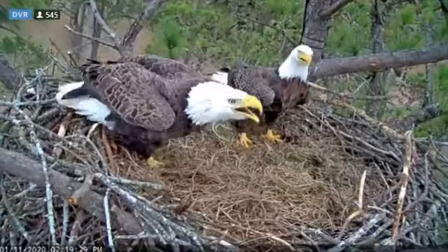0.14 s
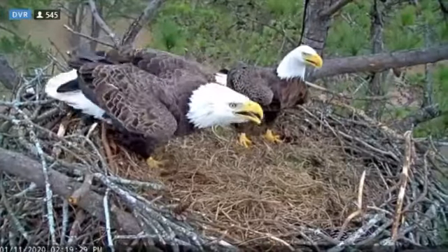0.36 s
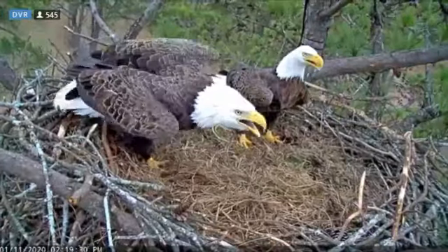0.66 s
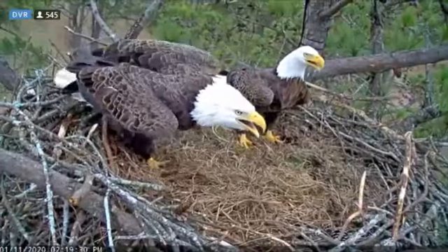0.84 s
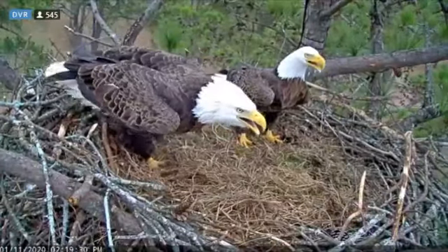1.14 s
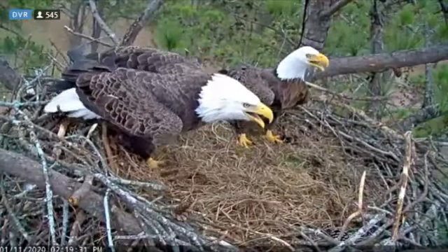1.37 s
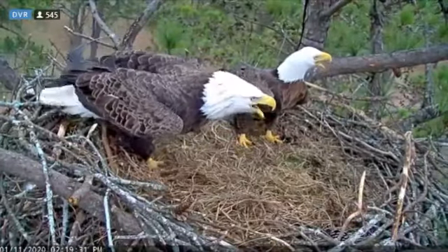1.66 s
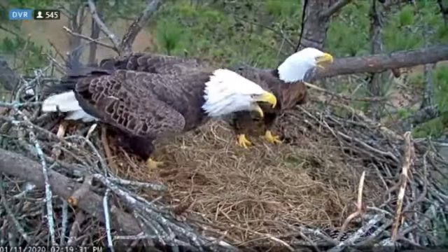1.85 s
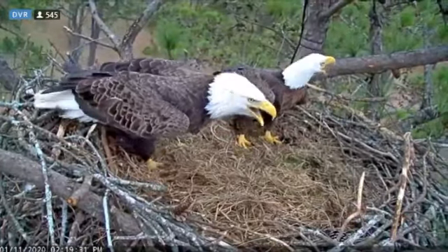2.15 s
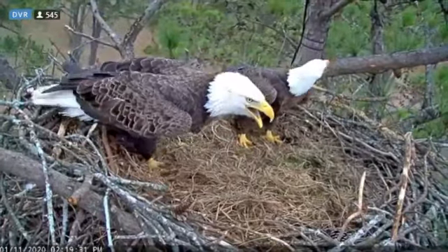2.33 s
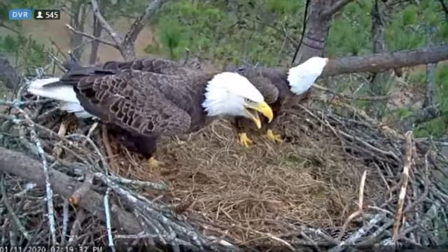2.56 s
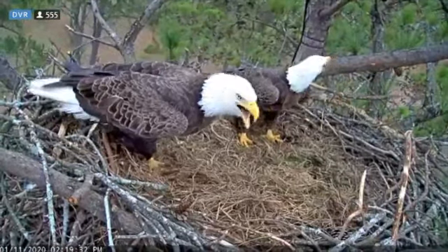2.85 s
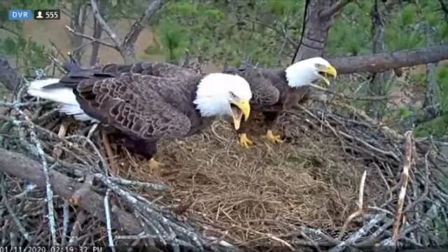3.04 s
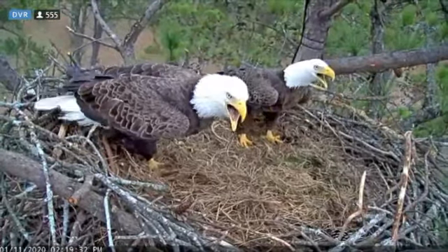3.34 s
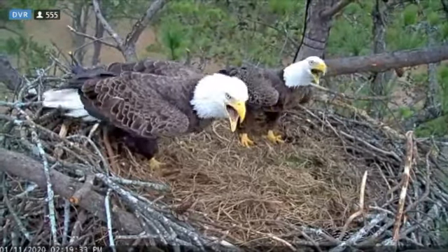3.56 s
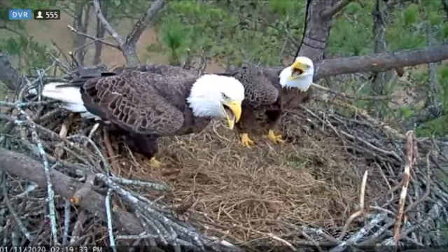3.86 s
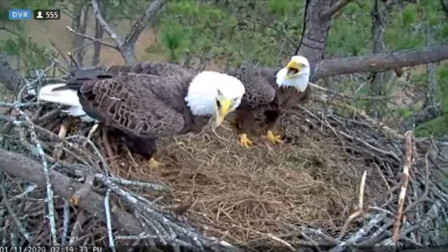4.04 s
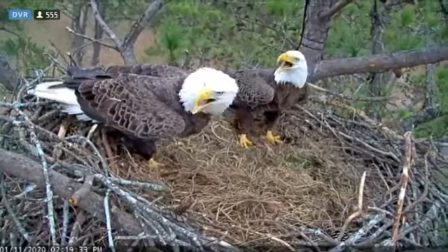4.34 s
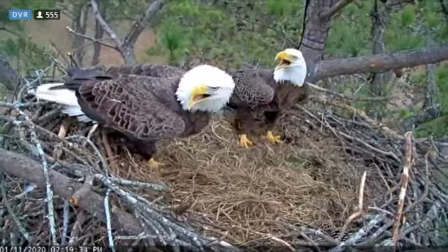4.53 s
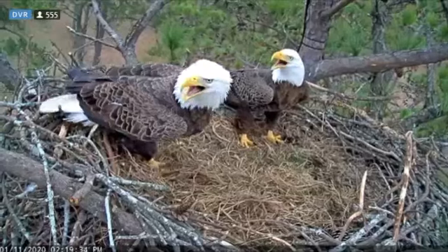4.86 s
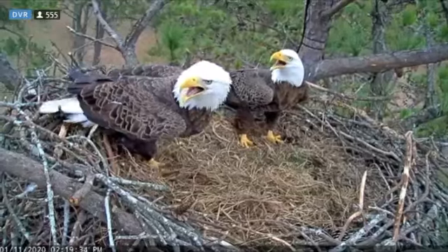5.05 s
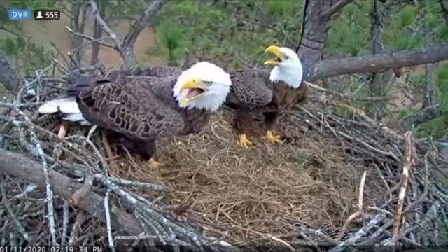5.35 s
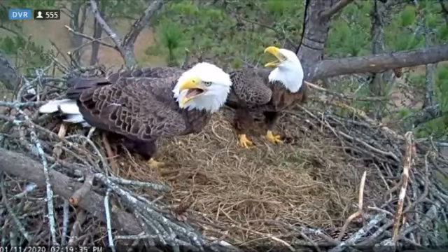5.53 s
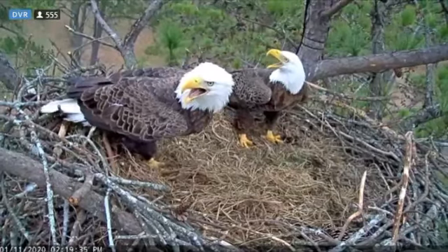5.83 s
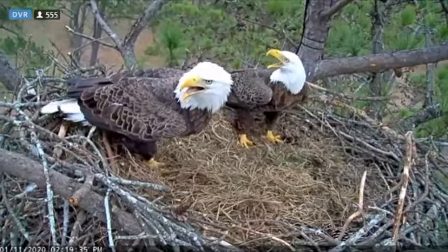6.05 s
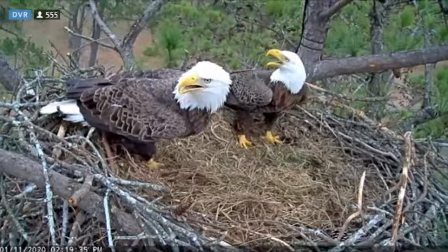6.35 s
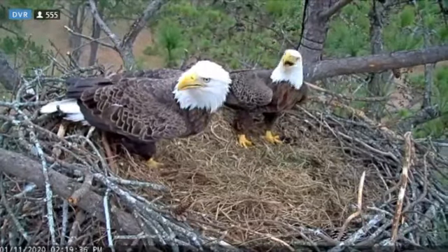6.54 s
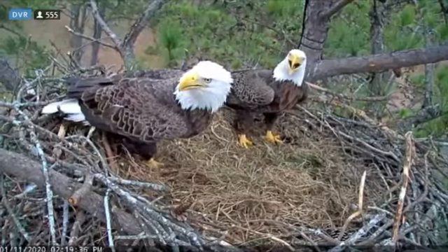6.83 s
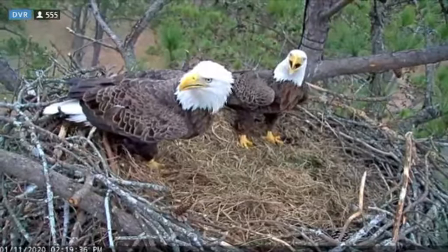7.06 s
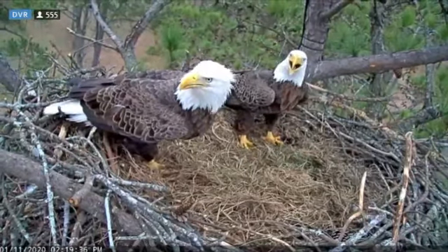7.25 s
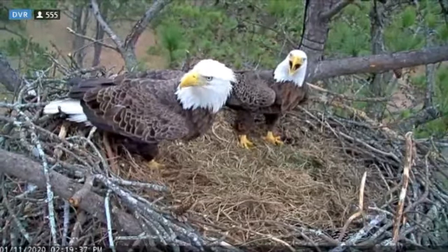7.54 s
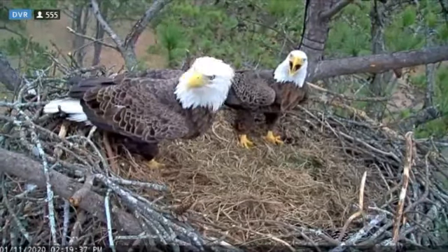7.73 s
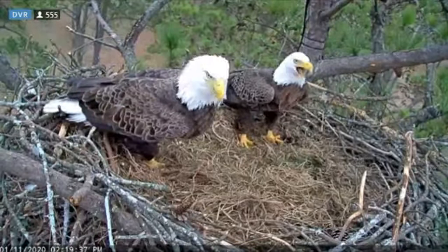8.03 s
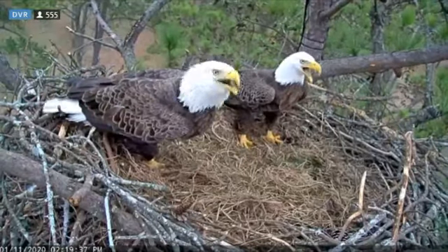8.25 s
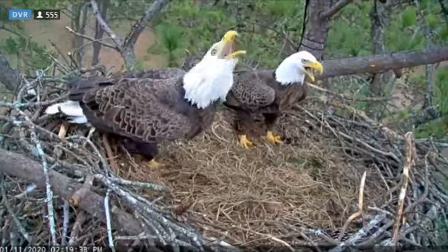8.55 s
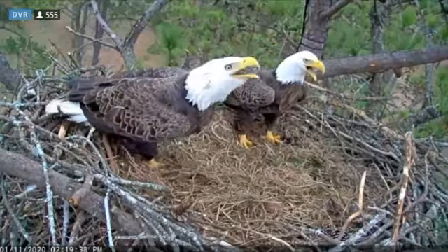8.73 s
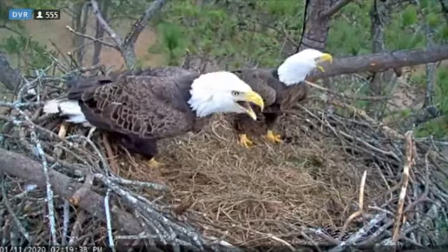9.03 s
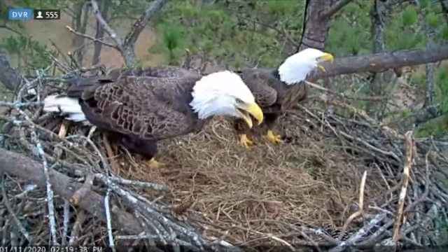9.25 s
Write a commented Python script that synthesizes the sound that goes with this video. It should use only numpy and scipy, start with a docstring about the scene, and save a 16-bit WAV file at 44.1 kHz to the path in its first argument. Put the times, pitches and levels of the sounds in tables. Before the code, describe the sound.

Two eagles call on a treetop nest in short bouts with brief pauses. They start with clear pips and creaky rasps, then break into quick runs of high, falling whistles and sharp chirps, some clean and some strained. The last calls end hoarsely. Soft low wind, faint rustling and a distant hum lie underneath. A small outdoor microphone gives the calls a thin, bright edge.

```python
"""Two eagles chatter on a treetop nest: clear pips, arched two-voiced whistles, quick chirps and a
creaky rasp. Membranes swinging in the voice box make the tones; rushing air and slipping folds make
the rasp. The sticks and trees echo faintly. Wind with soft thuds, rustling sticks and a distant hum lie
below. A small outdoor camera samples at a low rate, so every tone gets a mirror image in the treble."""
import sys
import numpy as np
from scipy import signal
from scipy.io import wavfile

SR = 44100
rng = np.random.default_rng(int(sys.argv[2]) if len(sys.argv) > 2 else 0)


def master_out(mix):
    """Clip the mix to full scale and print it as 16-bit PCM to the path in sys.argv[1]."""
    frames = np.transpose(np.atleast_2d(mix))
    ceiling = np.clip(frames, -1, 1)
    pcm = np.round(ceiling * 32767).astype(np.int16)
    wavfile.write(sys.argv[1], SR, pcm)


N = 414099

# Short, clear calls: start_s, length_ms, start_hz, end_hz, effort_db
PIPS = [(0.08, 10.9, 1581, 1980, -25.5), (0.089, 17.2, 2056, 2215, -25.5), (0.495, 30.1, 1781, 2390, -25),
        (0.52, 14.9, 2698, 2768, -23), (1.913, 19, 2872, 2872, -31.5), (1.906, 39.3, 2467, 2188, -42),
        (1.977, 25.2, 1799, 2230, -41), (2.001, 20.6, 2719, 2760, -28.5), (2.113, 19, 2261, 2187, -27),
        (2.221, 30.2, 2120, 2068, -27.5), (2.244, 17.6, 2191, 2061, -31), (2.336, 22.5, 1711, 1529, -32),
        (3.233, 33.7, 2067, 2476, -37.5), (3.251, 20, 2785, 2865, -24), (3.266, 16.4, 2716, 2765, -36),
        (3.276, 16.6, 2891, 2707, -27.5), (3.296, 17.4, 2838, 2685, -28), (3.363, 13.7, 2821, 2770, -21.5),
        (3.484, 17, 2700, 2775, -19), (3.618, 21.7, 2262, 2162, -21), (3.635, 22.95, 2161, 2285, -22.5),
        (3.769, 11.03, 1784, 2103, -22), (3.773, 31.3, 2079, 2027, -23), (3.789, 23.2, 1994, 2039, -25.5),
        (3.939, 22.1, 1713, 1542, -26), (5.043, 16, 2076, 2225, -26), (5.06, 18, 2270, 2353, -21.5),
        (5.08, 19.5, 2915, 2670, -25.5), (5.099, 19.3, 2826, 2674, -27), (5.119, 14.2, 2740, 2430, -33.5),
        (5.169, 23.9, 2661, 2849, -26), (5.193, 15.4, 2884, 2797, -25), (5.207, 19.4, 3046, 2693, -29),
        (5.227, 15.5, 2458, 1920, -41.5), (5.299, 23.3, 2272, 2312, -22), (5.362, 9.4, 2252, 1860, -31),
        (5.459, 24.6, 2245, 2137, -22), (5.474, 25.3, 2244, 2239, -20), (5.63, 14.5, 1824, 1952, -26.5),
        (5.638, 18.6, 2101, 1934, -23), (5.652, 25.8, 2018, 2000, -25), (5.88, 30.3, 1776, 1694, -25.5),
        (5.898, 26.8, 1729, 1625, -27), (6.259, 10.73, 1360, 1150, -31.5), (6.264, 15.76, 1310, 1141, -32),
        (8.49, 12.5, 1716, 1775, -32), (8.499, 11.34, 1972, 2100, -26), (8.514, 18, 2552, 2664, -26.5),
        (8.531, 18.6, 2748, 2723, -35), (8.924, 21.7, 1951, 2246, -25), (8.944, 20.4, 2722, 2680, -24.5)]
# Tone colour of the rustling and of the hiss around pips: pitch_hz, relative_db
HISS_SPECTRUM = [(1500, -32), (3000, -15), (5000, 0.5), (6800, 1), (7600, -4)]
USUAL_EFFORT_DB = -28   # pips pushed harder than this are brighter and hiss more


def from_db(db):
    """Turn decibels into a gain."""
    return 10 ** (np.asarray(db) / 20)


def unit_level(x):
    """Scale a sound to an average (rms) level of 1."""
    return x / np.sqrt(np.mean(x ** 2) + 1e-20)


def over_time(rows):
    """Join (time_s, value) rows into one value per sample."""
    return np.interp(np.arange(N) / SR, *np.transpose(rows))


def drift(per_s, size):
    """A random wobble of about 1: random points joined by lines."""
    step = SR / per_s
    points = rng.standard_normal(int(np.ceil(size / step + 2)))
    return 1.347 * np.interp(np.arange(size) / step, np.arange(len(points)), points)


def filtered(x, order, hz, kind, rate=SR):
    """Keep the "low" side, the "high" side or a "band" of a sound."""
    return signal.sosfilt(signal.butter(order, hz, kind, fs=rate, output="sos"), x)


def shaped_noise(spectrum, flicker_db):
    """Noise in half-octave bands, each with its own level and slow flicker."""
    out, edges = 0, 22 * 2 ** np.arange(0, 8.6, .5)
    white = rng.standard_normal((2, N))
    hz, db = np.transpose(spectrum)
    for k, (low, high) in enumerate(zip(edges, edges[1:])):
        level_db = np.interp(np.log(low * high) / 2, np.log(hz), db, right=-90)
        band = filtered(white[k % 2], 3, [low, high], "band")
        out = out + from_db(level_db + flicker_db * drift(8, N)) * band
    return unit_level(out)


def add(out, start_s, sound):
    """Mix a sound in at a given time."""
    at = round(start_s * SR)
    out[at:at + len(sound)] += sound


def progress(ms):
    """A ramp from 0 to 1 across a note, called u below."""
    return np.linspace(0, 1, round(ms * SR / 1000))


def swell(u, fullness, skew):
    """Fade in and out; low fullness is squarer, low skew peaks earlier."""
    return np.sin(np.pi * u ** skew).clip(0) ** fullness


def phase_of(hz):
    """The running angle of a wave that follows a pitch curve."""
    return 2 * np.pi * (np.cumsum(hz) / SR + rng.random())


def ring(x, hz, width_hz):
    """Pass a sound twice through one resonance; narrower rings longer."""
    r = np.exp(-np.pi * width_hz / SR)
    feed = np.array([1, 0, -1]) * (1 - r * r) / 2
    feedback = [1, -2 * r * np.cos(2 * np.pi * hz / SR), r * r]
    return signal.lfilter(feed, feedback, signal.lfilter(feed, feedback, x))


def distant_hum():
    """A faint, low wash of noise from far away."""
    # Tone colour of the hum: pitch_hz, relative_db
    spectrum = [(40, -44), (90, -30.5), (180, -2.5), (355, -7), (630, -14.5), (1170, -11), (1590, -26),
                (3200, -40), (6800, -33.5), (7800, -49)]
    return from_db(-60.5) * shaped_noise(spectrum, flicker_db=1.7161)


def far_wind():
    """Wind rushes through distant treetops."""
    # Strength of the rush: time_s, level_db
    levels = [(0, -63), (3, -64.5), (5, -70.5), (7.5, -71.5), (8.4, -65), (8.8, -55), (9.39, -69.5)]
    rush = filtered(rng.standard_normal(N), 2, [620, 1178], "band")
    return from_db(over_time(levels)) * unit_level(rush)


def wind_and_rustle():
    """Gusts rumble and stir the leaves; nest sticks shift and crackle."""
    # Strength of the wind: time_s, level_db
    levels = [(0, -42.5), (0.47, -47), (0.55, -55), (0.9, -52), (1.05, -61), (1.55, -54), (1.75, -61),
              (3.6, -60.5), (6.3, -66), (7.05, -63.5), (7.2, -59), (7.6, -59.5), (8.05, -51), (8.29, -63.5),
              (8.61, -54), (8.76, -61), (9.0, -54), (9.39, -58.5)]
    # Tone colour of the gusts: pitch_hz, relative_db
    spectrum = [(30, -29), (80, -13.5), (150, 0), (300, -5), (520, -32)]
    # Shifting sticks: start_s, length_ms, level_db
    stick_shifts = [(0.86, 157, -88)]
    gusts = from_db(over_time(levels) + 3 * drift(18, N))
    rustle = from_db(-29.5) * gusts   # the leaves follow the wind
    for start_s, ms, db in stick_shifts:
        u = progress(ms)
        crackle = from_db(db + 12.4 * drift(65.2, len(u)))
        add(rustle, start_s, crackle * swell(u, fullness=.98, skew=1))
    rumble = gusts * shaped_noise(spectrum, flicker_db=1)
    return rumble + rustle * shaped_noise(HISS_SPECTRUM, flicker_db=0)


def wind_bumps():
    """Gusts of wind make three short, low thuds."""
    # Thuds of wind: start_s, level_db
    bumps = [(7.272, -51), (7.327, -49.5), (7.405, -54)]
    pitch_hz, width_hz = 110.5, 77.4
    pushes = np.full(N, 1e-18)
    for start_s, db in bumps:
        pushes[round(start_s * SR)] = from_db(db) * SR / width_hz
    return ring(pushes, pitch_hz, width_hz)


def echo(x, level_db, fade_s):
    """Many small reflections blur into a tail that falls 60 dB in fade_s."""
    t = np.arange(round(.3 * SR)) / SR
    tail = rng.standard_normal(len(t)) * from_db(-60 * t / fade_s)
    tail /= np.sqrt(np.sum(tail ** 2))
    return from_db(level_db) * signal.fftconvolve(x, tail)[:N]


def throat(x, skip_lowest=0, flicker_db=0):
    """The throat rings at several pitches, each able to flicker on its own."""
    # Throat resonances: pitch_hz, width_hz, gain_db
    resonances = [(907, 330, -10.5), (1500, 640, -2.5), (2445, 1200, -14), (3500, 350, -10.5),
                  (4143, 500, -8.5), (5196, 660, -6), (6500, 2000, -9)]
    return sum((-1) ** k * from_db(db + flicker_db * drift(130, N)) * ring(x, hz, width_hz)
               for k, (hz, width_hz, db) in enumerate(resonances[skip_lowest:]))


def creaks():
    """Single soft slips of the folds ring the throat and chest for a few cycles."""
    # Lone slips: start_s, strength_db
    slips = [(0.5422, -43.5), (0.5499, -44.5), (0.6142, -40), (0.625, -38.5), (3.41, -42), (3.416, -48),
             (8.5536, -39.5), (8.601, -49.5), (8.638, -42.5), (8.658, -40.5), (8.683, -36), (8.69, -45.5),
             (8.978, -38), (9.005, -53.5), (9.023, -39), (9.032, -47), (9.041, -45), (9.05, -36.5),
             (9.0608, -36), (9.077, -41)]
    clicks = np.full(N, 1e-18)
    for start_s, db in slips:
        clicks[round(start_s * SR)] = from_db(db + 36.5)   # ringing spreads a click and lowers its peak
    creak = ring(clicks, hz=1498, width_hz=520)
    chest = ring(clicks, hz=340, width_hz=160)
    return creak + from_db(-1) * chest + from_db(-12) * throat(clicks, skip_lowest=2)


def rasps():
    """A fluttering hiss lies above uneven slips of the folds that croak in the throat."""
    # Hoarse endings of calls: start_s, length_ms, level_db
    endings = [(0.1, 164.5, -44.5), (0.527, 113.7, -46), (1.885, 83, -58.5), (2.0, 51, -55),
               (2.082, 87, -51), (3.327, 117.4, -47.5), (3.492, 69.8, -49.5), (5.111, 110, -54.5),
               (5.19, 110, -61), (5.31, 53, -48.5), (8.498, 210.6, -46.5), (8.935, 146.3, -45.5)]
    slips_per_s = 430
    hoarse_gain, croak_gain, hiss_gain = np.zeros((3, N))
    hiss_shape = swell(progress(ms=64), fullness=3, skew=.55)
    for start_s, *_, effort_db in PIPS:   # a short hiss surrounds each pip, starting just before it
        burst = from_db(1.7 * (effort_db - USUAL_EFFORT_DB)) * hiss_shape
        add(hiss_gain, start_s - .01, from_db(-55.5) * burst)
        add(croak_gain, start_s - .01, from_db(-66) * burst)
    for start_s, ms, db in endings:
        u = progress(ms)
        add(hoarse_gain, start_s, from_db(db) * swell(u, fullness=1.1, skew=.9))
        croak_db = db - 7.5 + 9.5 * u ** 3   # the croak grows as the air runs out
        add(croak_gain, start_s, from_db(croak_db) * swell(u, fullness=.8, skew=1.4))
    slips = (rng.random(N) < slips_per_s / SR) * rng.standard_normal(N)
    croak = unit_level(throat(6 * slips + .6 * rng.standard_normal(N)))
    hiss = from_db(3.5 * drift(300, N)) * shaped_noise(HISS_SPECTRUM, flicker_db=6)
    flutter = from_db(3.5 * drift(220, N)) * rng.standard_normal(N)
    hoarse = unit_level(throat(flutter, skip_lowest=2, flicker_db=5))
    return hoarse_gain * hoarse + hiss_gain * hiss + croak_gain * croak


def chirps():
    """The membrane makes one quick, unsteady glide up or down."""
    # Glides that open, break or trail a note: start_s, length_ms, start_hz, end_hz, level_db
    glides = [(0.172, 7.3, 3970, 5970, -38), (0.177, 8.3, 6124, 4600, -26.5),
              (3.328, 18.7, 4400, 5210, -42), (3.3483, 8, 5630, 4144, -14.5),
              (3.378, 13.2, 4273, 6150, -28.5), (3.238, 7.5, 6730, 5620, -34),
              (3.4757, 6.6, 5420, 3750, -22.5), (3.503, 5.6, 3710, 5412, -25.5),
              (3.509, 7.9, 5495, 4000, -28), (3.526, 6.8, 5700, 4010, -32.5),
              (3.61, 7.2, 4740, 3730, -29.5), (5.138, 15, 4078, 4470, -41),
              (5.161, 9.77, 5200, 3678, -18.5), (5.293, 7.1, 5146, 3900, -23),
              (5.45, 5.6, 5040, 3900, -27.5), (5.734, 8.96, 6680, 5240, -28),
              (6.39, 2.11, 5262, 3530, -43.5), (7.813, 6.6, 4909, 6250, -33),
              (7.819, 15.6, 6400, 5575, -17), (7.9251, 11.07, 6740, 5160, -13.5),
              (8.045, 6.84, 6336, 4503, -22.5)]
    out = np.zeros(N)
    for start_s, ms, start_hz, end_hz, db in glides:
        u = progress(ms)
        loudness = swell(u, fullness=1.6, skew=.7) * from_db(db + 2.2 * drift(600, len(u)))
        hz = start_hz + (end_hz - start_hz) * u ** 1.2
        waver = 1 + .028 * drift(800, len(u))
        add(out, start_s, loudness * np.sin(phase_of(hz * waver)))
    return out


def whistles():
    """Each side of the voice box sings a tone; strain makes both shake and lets air escape."""
    # Two-voiced calls: start_s, length_ms, middle_hz, end_hz, level_db, strain (0 clean, about 1 rough)
    calls = [(2.256, 54.5, 5563, 4470, -38, 0.34), (2.346, 51.5, 5744, 5335, -33, 0.26),
             (2.436, 49.9, 5877, 4610, -38, 0.52), (2.532, 47.6, 5075, 4790, -53.5, 0.88),
             (3.254, 9.9, 5147, 4950, -25, 0.03), (3.852, 61.7, 5480, 4356, -33, 0.34),
             (3.898, 35.3, 4453, 4730, -31, 0.2), (3.935, 61.2, 6007, 4300, -27.5, 0.4),
             (4.015, 63.5, 6274, 4410, -31.5, 1.01), (4.115, 48.7, 5570, 4190, -35.5, 0.88),
             (4.23, 14.23, 4404, 4230, -23.5, 0.22), (5.058, 16.25, 5050, 4735, -19.5, 0.06),
             (5.301, 18.5, 4997, 5210, -18, 0), (5.559, 71.7, 5124, 4500, -43.5, 0.35),
             (5.655, 56.4, 6320, 4750, -36.5, 0.67), (5.74, 59.2, 6180, 4085, -36.5, 0.77),
             (5.848, 42.4, 5710, 5090, -38.5, 0.78), (5.957, 45.2, 5187, 4300, -46, 1.08),
             (6.087, 16.25, 4350, 3950, -33, 0.12), (7.736, 63.5, 5341, 4032, -33, 0.23),
             (7.829, 56.5, 6253, 4190, -25, 0.74), (7.933, 50.4, 6565, 4170, -25.5, 1.04),
             (8.052, 39.2, 5780, 4380, -24, 0.63), (8.173, 20.9, 5470, 5540, -41, 0.74),
             (8.188, 20.5, 4632, 4218, -23, 0.09), (8.51, 30.2, 3317, 3200, -36.5, 0.33),
             (8.299, 30.6, 4504, 4316, -39.5, 0.32)]
    settled_at, fall_from = .54, .35   # shares of the note's length
    breaks_per_s = 98
    out, air = np.zeros((2, N))
    for start_s, ms, middle_hz, end_hz, upper_db, strain in calls:
        u, length_s = progress(ms), ms / 1000
        # Short or strained whistles start above their middle pitch; long, clean ones climb to it.
        start_hz = middle_hz * (1.07 - 4.2 * length_s * (1 - 1.2 * strain))
        opening = (1 - u / settled_at).clip(0) ** 2
        fall = ((u - fall_from).clip(0) / (1 - fall_from)) ** (2 + strain)
        arch_hz = middle_hz + (start_hz - middle_hz) * opening - (middle_hz - end_hz) * fall
        # A strained upper voice keeps slipping down and catching again.
        break_depth = np.clip(2.5 * strain - .6, 0, 1) * (1.8 - 2.7 * u).clip(0, 1)
        breaks = break_depth * np.cos(np.pi * breaks_per_s * length_s * u) ** 8
        upper_hz = arch_hz * (1 - .28 * breaks)
        # The lower voice joins in long, strained whistles.
        lower_hz = .79 * (1 - .11 * strain) * (.72 * arch_hz + .2944 * middle_hz)
        lower_db = upper_db - 45 + 474.5 * length_s + 10.5 * strain
        for hz, db in ((upper_hz, upper_db - 10 * breaks), (lower_hz, lower_db)):
            waver = 1 + strain * (.0086 * drift(221, len(u)) + .014 * drift(800, len(u)))
            stutter_db = (.8 + 4 * strain) * drift(300, len(u))
            loudness = from_db(db + stutter_db) * swell(u, fullness=1.1, skew=.9)
            add(out, start_s, loudness * np.sin(phase_of(hz * waver)))
        puff = swell(progress(ms * 1.65), fullness=1, skew=.33)
        add(air, start_s - .004, strain * from_db(upper_db - 17) * puff)
    hiss = filtered(rng.standard_normal(N), 3, [3800, 7000], "band")
    return out + air * unit_level(hiss)


def pips():
    """A membrane swings briefly and a little unevenly; overtones come in near full swing."""
    # How the windpipe and open beak boost or soften each harmonic: pitch_hz, gain_db
    windpipe = [(1200, -0.5), (1700, 5.5), (2050, 1.5), (2330, -5), (2750, -6), (3350, -4.5), (3800, 1),
                (4100, 4), (4450, 11), (4700, 9.5), (5100, 12.5), (5600, 16), (6150, 13), (6700, 14.5),
                (7500, 8.5), (8200, -29)]
    usual_hz, shaky_above_hz, dullest_effort_db = 2303, 2500, -36
    out = np.zeros(N)
    for start_s, ms, start_hz, end_hz, effort_db in PIPS:
        u = progress(ms)
        hz = start_hz + (end_hz - start_hz) * u
        phase = phase_of(hz * (1 + .0081 * drift(340, len(u))))
        swing = swell(u, fullness=1.097, skew=.8155) * from_db(.53 * drift(530, len(u)))
        # Harder and lower pips lose less from one harmonic to the next.
        push_db = max(effort_db, dullest_effort_db) - USUAL_EFFORT_DB
        step_db = (.9764 * push_db - 13.5) * hz / usual_hz
        shake_db = 2.5 * (end_hz > shaky_above_hz)   # high pips flicker, mostly in their overtones
        for k in range(7):   # 0 is the base tone
            windpipe_db = np.interp((k + 1) * hz, *np.transpose(windpipe))
            flicker_db = shake_db * min(k + .16, 1) * drift(400, len(u))
            gain = from_db(effort_db + k * step_db + windpipe_db + flicker_db)
            add(out, start_s, gain * swing ** (1 + .5 * k) * np.sin((k + 1) * phase))
    return out


def scene():
    """The eagles and their echoes over the background, in one channel."""
    eagles = pips() + whistles() + chirps() + rasps() + creaks()
    nest_echo = echo(eagles, level_db=-15.5, fade_s=.05)
    trunk_echo = echo(eagles, level_db=-27, fade_s=.24)
    background = wind_and_rustle() + distant_hum() + far_wind() + wind_bumps()
    return (background + nest_echo + trunk_echo + eagles)[None]


def record(dry):
    """The camera rounds off peaks and samples at a low rate, which mirrors tones into the treble."""
    rate_hz, cutoff_hz = 16000, 15300
    overload, step_share = .2534, .14
    sampled = signal.resample_poly(dry[0], rate_hz // 100, SR // 100)
    # Overtones of the rounding fold back as low knocks under the loudest notes.
    rounding = overload * np.tanh(sampled / overload) - sampled
    # The microphone gives more to one side, so loud notes push a low puff.
    puff = .2 * filtered(sampled ** 2, 4, 2400, "low", rate_hz)
    distortion = filtered(rounding + puff, 3, 230, "high", rate_hz)
    sampled = filtered(sampled + distortion, 2, 60, "high", rate_hz)
    # Joining the samples with steps and straight lines leaves the mirror tones.
    position = np.arange(N) * rate_hz / SR
    steps = sampled[np.minimum(np.round(position).astype(int), len(sampled) - 1)]
    lines = np.interp(position, np.arange(len(sampled)), sampled)
    played = step_share * steps + (1 - step_share) * lines
    treble_cut = signal.cheby2(10, 50, cutoff_hz, fs=SR, output="sos")
    return signal.sosfilt(treble_cut, played)[None]


dry = scene()
out = record(dry)
master_out(out)
```